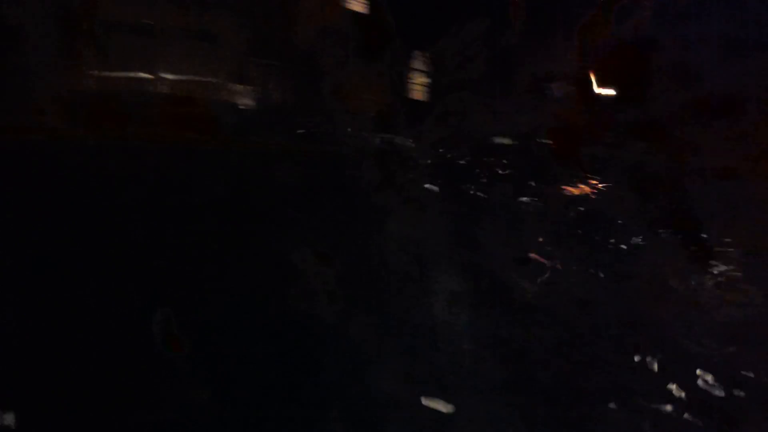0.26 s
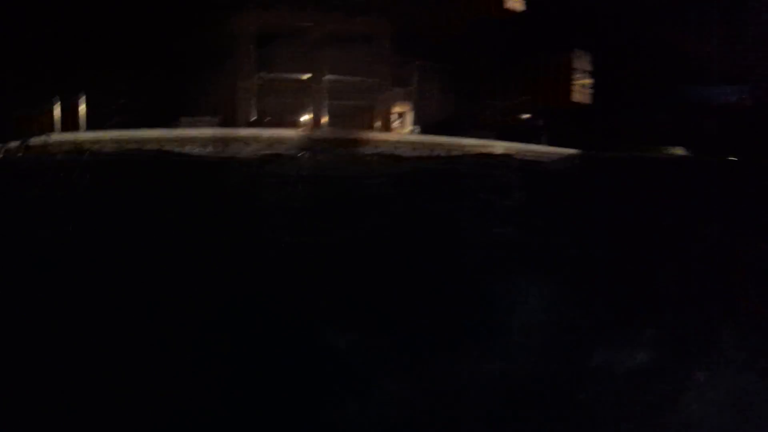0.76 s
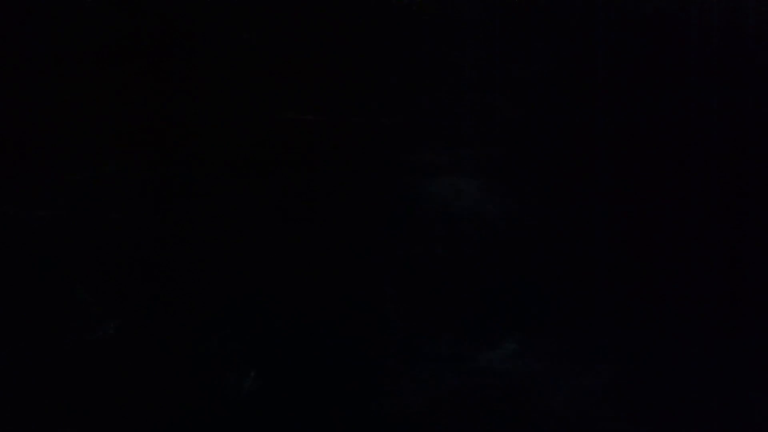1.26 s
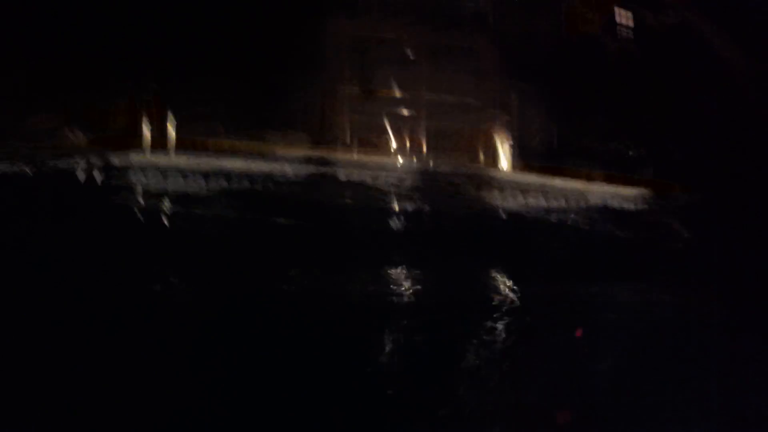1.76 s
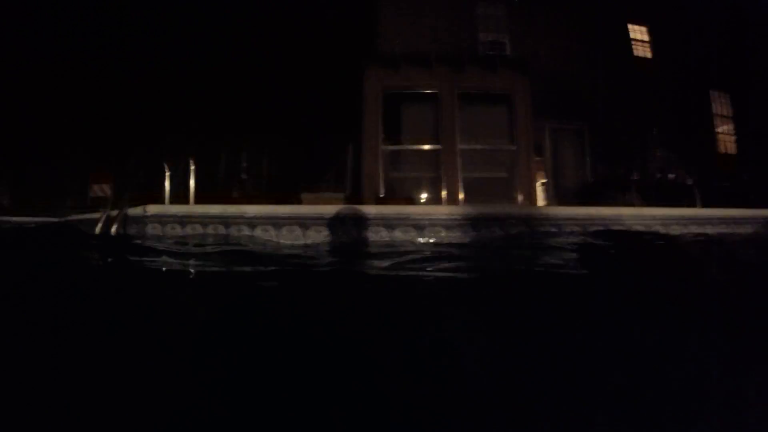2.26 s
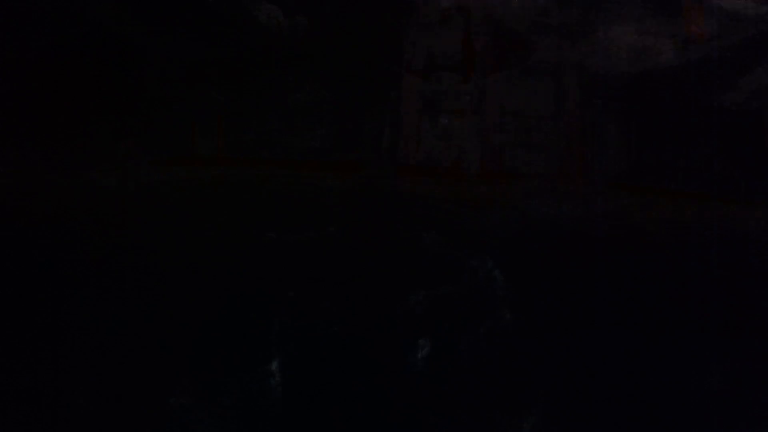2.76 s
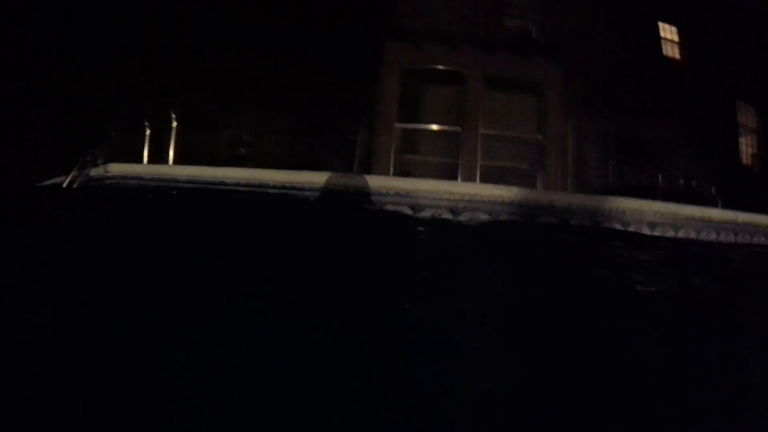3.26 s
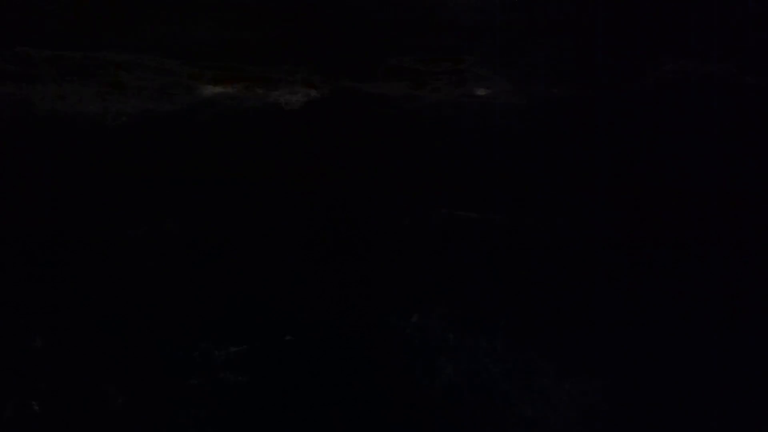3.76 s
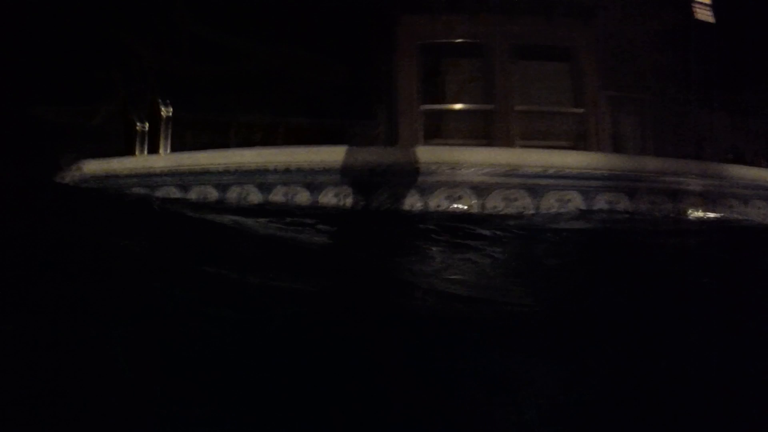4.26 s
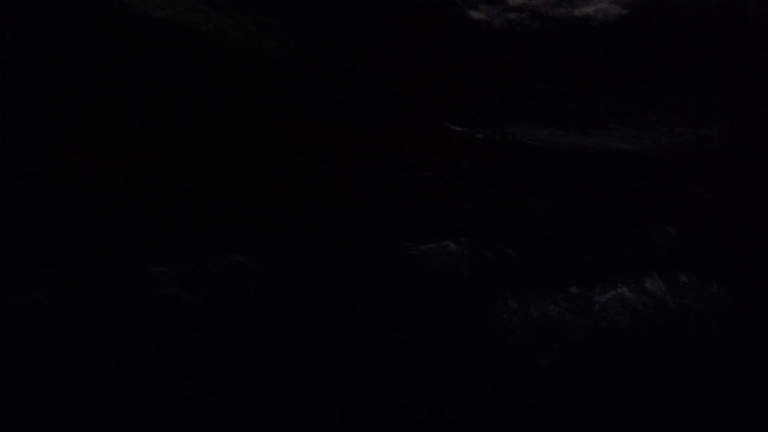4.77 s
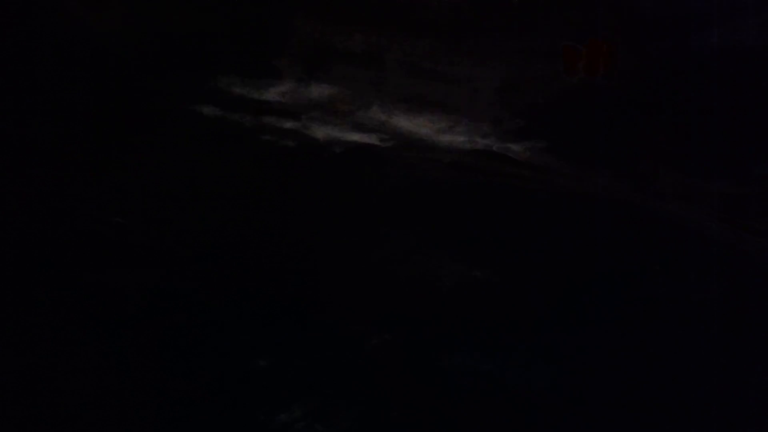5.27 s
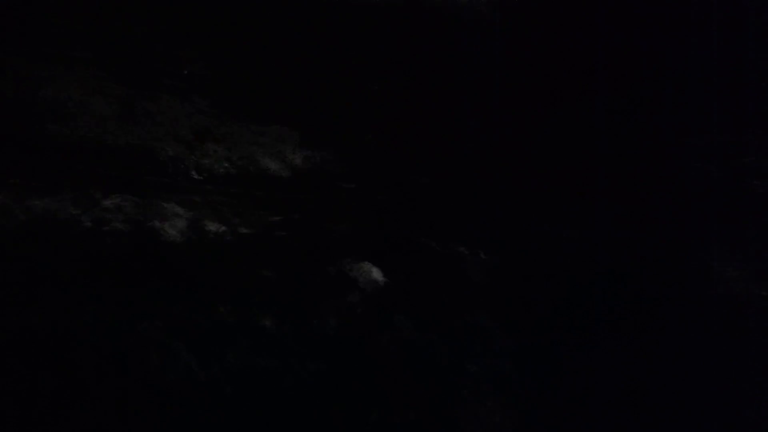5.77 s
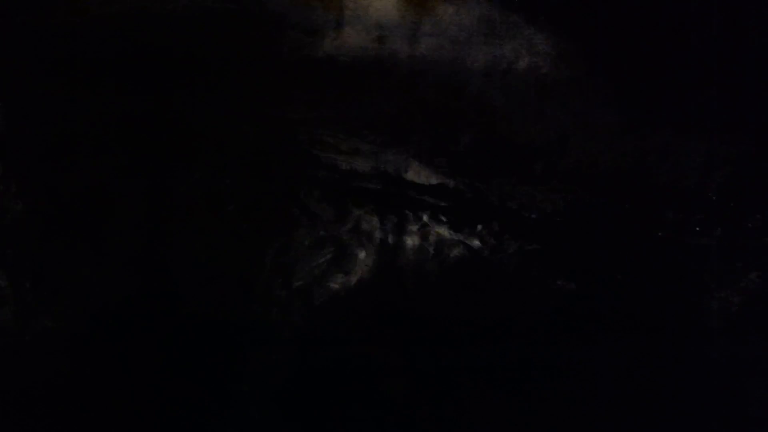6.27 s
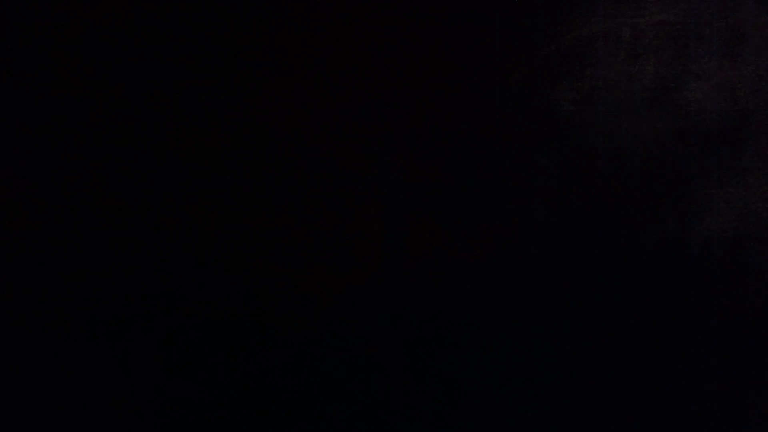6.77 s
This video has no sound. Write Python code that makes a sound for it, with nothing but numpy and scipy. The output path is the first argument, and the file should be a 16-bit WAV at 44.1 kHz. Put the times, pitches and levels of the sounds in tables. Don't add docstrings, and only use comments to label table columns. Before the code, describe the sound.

Close-up watery knocks and bubbly plinks hit a small hard shell in uneven bursts, separated by quiet trickling, faint fizz and drips.

```python
import sys
import numpy as np
from scipy import signal
from scipy.fft import rfft, irfft, next_fast_len
from scipy.io import wavfile
from scipy.ndimage import uniform_filter1d, map_coordinates

SR = 44100
rng = np.random.default_rng(int(sys.argv[2]) if len(sys.argv) > 2 else 0)


def int16_out(signal):
    q = np.round(np.clip(np.atleast_2d(signal).T, -1, 1) * 32767)
    wavfile.write(sys.argv[1], SR, q.astype(np.int16))


def gain_from_decibels(decibels):
    exponent = np.asarray(decibels, float) / 20
    return 10 ** exponent


N = 309141

# centre_hz, width_hz, level_db
CASE = [(155, 180, -3.5)]
# centre_hz, width_hz, level_db
SHELL = [(860, 170, -8.5), (1250, 60, 6), (1510, 47, 3.5), (2140, 520, -0.5), (3000, 1300, -6.5)]
# centre_hz, width_hz, level_db
LID = [(3570, 980, -5.5), (5570, 400, -1.5), (6500, 260, 0), (8700, 310, -6), (10527, 5900, -20)]


def unit(x):
    return x / np.sqrt(np.mean(x ** 2) + 1e-20)


def filtered(x, response):
    m = next_fast_len(N + SR // 2)
    return irfft(rfft(x, m) * response(np.fft.rfftfreq(m, 1 / SR)), m)[:N]


def coloured(x, points):
    f, db = np.transpose(points)
    return unit(filtered(x, lambda hz: gain_from_decibels(np.interp(np.log(hz + 1), np.log(f + 1), db))))


def resonant(x, modes):
    def response(f):
        total = 0
        for k, (centre, width, db) in enumerate(modes):
            mode = 1j * f * width / (centre * centre - f * f + 1j * f * width)
            total = total + (-1) ** k * gain_from_decibels(db) * mode
        return total
    return filtered(x, response)


def wobble(rate):
    knots = rng.standard_normal(int(N * rate / SR) + 4)
    return map_coordinates(knots, [np.arange(N) * rate / SR])


def flutter(shape, size):
    once = uniform_filter1d(rng.standard_normal(shape), size)
    return unit(uniform_filter1d(once, size))


def humps(rows):
    t = np.arange(N) / SR
    total = np.zeros(N)
    for s, rise, fall, db in rows:
        total += db * np.clip(np.minimum(1 + (t - s) / rise, 1 - (t - s) / fall), 0, 1)
    return total


def placed(rows, s):
    at = np.round(s * SR).astype(int) + np.arange(rows.shape[1])
    return np.bincount(at.ravel(), rows.ravel(), N + rows.shape[1] + SR)[:N]


def bubbles(t, hz, t60, rise, attack):
    phase = 2 * np.pi * hz * t * (1 + rise * t / t60)
    return np.sin(phase) * gain_from_decibels(-60 * t / t60) * (1 - np.exp(-t / attack))


def grains(count, centre_hz, octaves, cycles, spread_db, size):
    s, pitch, chance = rng.random((count, 3)).T[:, :, None]
    hz = np.clip(centre_hz * 2 ** (octaves * (2 * pitch - 1)), 100, 15000)
    rows = bubbles(np.arange(size) / SR, hz, cycles / hz, rise=0.21, attack=3.3 / hz)
    level = gain_from_decibels(-spread_db * np.log(chance + 0.01))
    return unit(placed(rows * level, s * N / SR))


def slosh():
    # freq_hz, density_db
    slosh_spectrum = [(12, -36.5), (20, -1), (70, -8), (210, -10), (328, -16.5), (700, -18.5), (910, -48),
                      (1540, -120)]
    # time_s, level_db
    bob = [(0, -56), (1.261, -56.5), (1.3, -78), (1.45, -53.5), (1.721, -65), (1.811, -67.5), (1.9, -43.5),
           (2.048, -66), (2.349, -58.5), (2.8, -55.5), (2.9, -62.5), (3.301, -56.5), (3.801, -61.5),
           (4.601, -55.5), (4.9, -60), (5.45, -48.5), (5.64, -63), (6.74, -52.5)]
    # peak_s, rise_s, fall_s, gain_db
    lurch = [
        (6.771, 0.031, 0.49, 21),
    ]
    slosh_db = np.interp(np.arange(N) / SR, *np.transpose(bob)) + humps(lurch)
    swell = coloured(rng.standard_normal(N), slosh_spectrum)
    rocking = np.clip((slosh_db + 57.5) / 18, 0, 0.9)
    pushed = (1 - rocking) * swell + rocking * unit(resonant(swell, CASE))
    return gain_from_decibels(slosh_db - 0.5 + 0.83 * wobble(8.0)) * pushed


def gurgle(gurgle_db, grainy, surge):
    # freq_hz, density_db
    gurgle_spectrum = [(180, -37.5), (300, -11), (800, 3.5), (1530, 0), (2300, -8.5), (3630, -14),
                       (5850, -47), (9900, -120)]
    bed = coloured(rng.standard_normal(N), gurgle_spectrum)
    bed = unit(bed + 2.8 * resonant(bed, SHELL))
    drips = grains(count=2200, centre_hz=1400, octaves=0.91, cycles=60, spread_db=1.4, size=2200)
    drips = unit(drips + 0.39 * resonant(drips, SHELL))
    return gain_from_decibels(gurgle_db - 1.47 + 2.8 * surge) * ((1 - grainy) * bed + 1.5 * grainy * drips)


def fizz(fizz_db, grainy, surge, wash_db, sealed_db):
    # freq_hz, density_db
    fizz_spectrum = [(1300, -27.5), (2300, -1.5), (3600, -6.5), (6500, -11.5), (9500, -17), (13800, -20.5),
                     (16000, -44)]
    hiss = coloured(rng.standard_normal(N), fizz_spectrum)
    hiss = unit(hiss + 0.55 * resonant(hiss, LID + SHELL))
    spits = grains(count=4000, centre_hz=5640, octaves=1.2, cycles=9, spread_db=4, size=400)
    spits = np.clip((wash_db - sealed_db) / 24, 0.2, 1) * spits
    unrest_db = 5.0 * np.clip(wash_db / 30, 0, 1) * (surge + wobble(76))
    return gain_from_decibels(fizz_db + 0.5 + unrest_db) * ((1 - grainy) * hiss + 0.6 * grainy * spits)


def water():
    # crest_s, rise_s, fall_s, over_calm_db, extra_spray_db
    surges = [(0, .1, 0.084, 12.5, -10), (.3, 0.43, 0.45, 6, 2), (1.25, 0.12, 0.062, 17, -19.5),
              (1.611, 0.22, 0.3, 20, -2), (1.899, 0.074, 0.1, 31.5, -1.5), (2.33, 0.094, 0.32, 6, 0),
              (2.8, 0.078, 0.082, 28.5, -9), (3.94, 0.082, 0.043, 13.5, 5.5), (4.75, 0.25, 0.039, 12.5, -2),
              (5.451, 0.34, 0.34, 22, -0.5), (6.929, 0.27, 0.2, 37, -5.5)]
    # deepest_s, closing_s, draining_s, loss_db
    dunks = [
        (1.3, 0.037, 0.28, 27),
        (2.13, 0.22, 0.21, 6),
        (2.9, 0.066, 0.21, -2.5),
        (3.8, 0.4, 0.13, 5.5),
        (4.9, 0.18, 0.19, 3.5),
        (5.64, 0.04, 0.45, 12),
        (6.81, .12, 0.069, 7),
    ]
    calm_gurgle_db, calm_fizz_db = -61.5, -60.5
    gurgle_sealed = 0.49
    wash_db, sealed_db = humps(row[:4] for row in surges), humps(dunks)
    spray_db = humps((s, rise, fall, db) for s, rise, fall, _, db in surges)
    gurgle_db = calm_gurgle_db + wash_db - gurgle_sealed * sealed_db
    fizz_db = calm_fizz_db + wash_db + spray_db - sealed_db
    grainy = np.clip((gurgle_db + 78.5) / 34, 0.25, 0.65)
    surge = wobble(28)
    moving = gurgle(gurgle_db, grainy, surge) + fizz(fizz_db, grainy, surge, wash_db, sealed_db)
    return slosh() + gain_from_decibels(0.8 * wobble(4.5)) * moving


def ringing(rows, cycles):
    s, db, hz = np.transpose(rows)[:, :, None]
    t = np.arange(SR // 14) / SR
    waver = 1 + 0.12 * flutter((len(s), len(t)), size=65)
    t60 = cycles / hz * (hz / 1500) ** 0.24
    ring = bubbles(t, hz, t60, rise=0.015, attack=3.3 / hz)
    ring = placed(gain_from_decibels(db + 7.0) * waver * ring, s)
    return ring + resonant(0.08 * ring, SHELL)


def froth():
    # start_s, peak_db, pitch_hz
    crowd = [(0.0117, -51, 1000), (0.381, -42, 2130), (0.4324, -36, 1390), (0.5095, -35, 1530),
             (0.524, -27, 3617), (0.6797, -36, 1250), (0.8567, -38.5, 4040), (1.0245, -37, 2420),
             (1.0259, -40, 1379), (1.0579, -16.5, 2804), (1.0724, -26.5, 2140), (1.576, -31, 1600),
             (1.6021, -32, 2350), (1.6122, -35, 3400), (1.6558, -36, 2210), (1.6863, -36, 2190),
             (1.8243, -37, 3500), (1.8778, -15, 4050), (1.8778, -12.5, 2296), (1.9417, -31, 2173),
             (2.02, -42, 2240), (2.7631, -30.5, 771), (2.8182, -33.5, 2756), (2.9633, -30.5, 731),
             (2.9837, -36.5, 2900), (3.6272, -33, 1660), (4.536, -36.5, 2430), (4.6439, -35, 1566),
             (4.6686, -25, 1760), (4.7556, -37, 1395), (5.2084, -43.5, 3560), (5.325, -36, 4270),
             (5.34, -29, 3740), (5.3463, -27.5, 1450), (5.3666, -38, 3014), (5.3695, -33, 1480),
             (5.3934, -35, 3800), (5.3971, -34.5, 1630), (5.4624, -25, 3930), (5.5576, -37.5, 3273),
             (5.8857, -39.5, 870), (6.8109, -33.5, 2260), (6.8396, -26.5, 2200), (6.8425, -33, 840),
             (6.9049, -29, 2930), (6.9224, -25.5, 3980), (6.9383, -23, 4048), (6.9584, -28, 3875),
             (6.9659, -31, 3170), (6.9717, -29, 1100), (6.976, -26, 3359), (6.985, -32, 2270)]
    # start_s, peak_db, pitch_hz
    pockets = [(0.0075, -45, 1095), (0.0496, -43, 1640), (1.114, -18, 1560), (0.2194, -30.5, 926),
               (0.2905, -22.5, 2150), (0.3558, -48, 2180), (0.4806, -45.5, 918), (0.8275, -45, 870),
               (0.8405, -44.5, 2120), (0.8608, -43, 1630), (1.1554, -31.5, 1186), (1.1772, -27, 2590),
               (1.3165, -55, 684), (1.5255, -41, 3240), (1.8637, -27.5, 1010), (1.9391, -34, 1011),
               (1.9841, -41, 3450), (1.9841, -34, 1540), (2.1104, -51.5, 1520), (1.203, -23, 880),
               (2.2961, -49.5, 1535), (2.3934, -47.5, 2325), (2.841, -24, 1480), (2.7997, -21, 1464),
               (2.8998, -54, 930), (2.926, -41.5, 1254), (3.0261, -54, 1444), (0.533, -23, 1200),
               (3.0537, -49.5, 893), (3.1974, -25, 957), (4.8169, -53.5, 2267), (4.8358, -48.5, 1046),
               (4.9316, -48, 3370), (5.2001, -49, 1257), (5.6398, -46, 771), (5.6746, -45, 1098),
               (5.798, -49, 883), (5.991, -44.5, 1330), (3.003, -38, 900), (6.123, -49.5, 720),
               (6.8298, -29.5, 1521)]
    return ringing(crowd, cycles=48) + ringing(pockets, cycles=54)


def glides():
    # start_s, level_db, from_hz, to_hz, length_s
    closing = [
        (1.969, -24.5, 700, 770, 0.052),
        (3.187, -20.5, 824, 1470, 0.043),
        (3.596, -27, 916, 3000, 0.046),
        (4.717, -21, 950, 2385, 0.023),
    ]
    s, db, low_hz, high_hz, length = np.transpose(closing)[:, :, None]
    u = np.clip(np.arange(SR // 16) / SR / length, 0, 1)
    hz = low_hz * (high_hz / low_hz) ** (u ** 2)
    phase = 2 * np.pi * np.cumsum(hz, axis=1) / SR
    level = gain_from_decibels(db - 19 * u + 3.0 * wobble(120)[:u.shape[1]])
    return placed(level * np.sin(np.pi * u) ** 0.39 * np.sin(phase), s)


def droplets(rows, gain_db):
    s, db, hz = np.transpose(rows)[:, :, None]
    t = np.arange(SR // 50) / SR
    noise = rng.standard_normal((2, len(s), len(t)))
    swell = gain_from_decibels(db + gain_db) * 0.64 * (1 - np.exp(-t / 0.00022)) * np.exp(-t / 0.0015)
    rough = 0.58 + 0.37 * unit(uniform_filter1d(noise[0], size=14, axis=1))
    ping = placed(swell * rough * np.sin(2 * np.pi * hz * t), s - 0.0005)
    patter = placed(gain_from_decibels(-0.5) * swell * noise[1], s - 0.0005)
    return ping + resonant(patter, LID)


def ticks():
    # start_s, level_db, pitch_hz
    single = [(0.2757, -29, 9653), (.2883, -27.5, 7760), (.3075, -29.5, 5650), (1.0274, -31, 5595),
              (1.0735, -13, 5178), (1.1948, -22, 7426), (1.2432, -33, 5004), (1.6255, -22, 8603),
              (1.8718, -29.5, 9670), (1.8806, -13.5, 8576), (1.8969, -26.5, 6550), (1.9441, -19.5, 4857),
              (2.7616, -26, 6620), (2.7868, -5.5, 5098), (2.7959, -9, 8526), (2.804, -21, 6626),
              (2.9668, -13.5, 9337), (3.555, -8.5, 8257), (3.7881, -25, 8566), (4.548, -18, 6500),
              (4.5975, -10.5, 5835), (4.7294, -9, 5720), (4.7575, -19, 7960), (4.7751, -9, 7367),
              (5.3939, -22, 5364), (5.43, -21, 5514), (5.4715, -21, 4836), (5.5221, -23.5, 6486),
              (5.5301, -25, 8665), (6.8754, -21, 6084)]
    # start_s, level_db
    stray = [(1.214, -36), (2.942, -40), (0.3584, -39), (0.3725, -51), (0.608, -48.5), (1.139, -27.5),
             (1.1585, -32), (1.276, -42.5), (1.56, -33.5), (1.7145, -39), (1.838, -34), (2.006, -35),
             (2.0436, -34.5), (2.3976, -47), (2.594, -45.5), (3.2285, -46), (3.6507, -37.5),
             (3.7231, -29.5), (3.738, -32), (3.78, -32.5), (3.941, -34), (3.982, -37), (4.3694, -40),
             (4.537, -33.5), (4.579, -30), (4.644, -38), (5.5855, -22.5), (5.6195, -40.5), (6.86, -29.5),
             (6.9214, -34.5),
             (1.4765, -47.5), (1.5406, -40.5), (1.5931, -41), (1.604, -44), (1.6452, -43.5), (1.6857, -36),
            (1.7214, -41), (3.573, -30.5), (3.731, -36.5), (4.543, -34), (4.6319, -39), (4.7218, -30.5),
            (4.7366, -29.5), (6.8987, -31), (6.9125, -35), (6.9716, -25.5), (6.9804, -28)]
    specks = stray
    octaves = 0.33 * rng.uniform(-1, 1, len(specks))
    specks = [(s, db, 6500 * 2 ** a) for (s, db), a in zip(specks, octaves)]
    return droplets(single + specks, 16.07)


def spray():
    # start_s, level_db, pitch_hz
    fine = [(0.2852, -21, 11410), (0.3104, -28, 6360), (0.3117, -28, 7780), (0.3712, -30.5, 9250),
            (0.5305, -29, 12200), (0.594, -33.5, 6430), (1.055, -32, 5340), (1.0589, -19.5, 6070),
            (1.1046, -21.5, 5440), (1.1042, -20, 8735), (1.1042, -27, 6533), (1.8938, -24, 7665),
            (1.962, -30.5, 4620), (2.0418, -32.5, 7240), (2.9635, -23, 4450), (3.5546, -13, 6700),
            (3.7864, -23.5, 8236), (4.3689, -30, 7873), (4.751, -31, 6500), (4.7725, -7.5, 6494),
            (4.7771, -36, 12550), (5.5001, -34.5, 8520), (5.5186, -22.5, 6680), (6.873, -20.5, 9200),
            (6.873, -20.5, 7823), (6.9702, -30, 6370)]
    return droplets([(s + 0.0013, db, hz) for s, db, hz in fine], 13.0)


def shoves():
    # start_s, peak_db
    pushes = [(0.299, -44), (0.5292, -39.5), (1.0718, -40), (1.1082, -36), (1.1935, -44), (1.2441, -22),
              (1.43, -42), (1.452, -40), (1.8773, -32), (1.9213, -33), (1.9685, -46.5), (2.7612, -39),
              (2.7835, -32), (2.8033, -36.5), (2.9438, -38), (3.5677, -45), (4.5479, -27), (4.668, -40.5),
              (4.7174, -43.5), (4.7795, -36), (5.396, -46), (5.4305, -23), (5.4647, -35.5), (5.483, -39),
              (5.5254, -27.5), (5.5405, -30.5), (5.561, -35.5), (5.5824, -29.5), (6.7719, -17),
              (6.7925, -21), (6.81, -27), (6.8355, -19.5), (6.8553, -38), (6.8745, -24), (6.908, -45),
              (6.9365, -36), (6.9528, -41), (6.9768, -29)]
    s, db = np.transpose(pushes)[:, :, None]
    u = np.arange(SR // 30) / SR / 0.00044
    return resonant(placed(gain_from_decibels(db + 16.5) * u * np.exp(-u), s), CASE)


def trapped():
    # start_s, peak_db, pitch_hz, t60_s
    blows = [(0.2836, -14, 3000, 0.028), (0.5304, -5.5, 1448, 0.041), (1.056, -18, 2748, .012),
             (1.058, -3.5, 4050, 0.018), (1.1101, 0, 1668, 0.011), (1.246, 5, 1783, 0.0047),
             (1.8543, -12, 3633, 0.014), (1.8981, -14.5, 2758, 0.018), (1.9005, -11, 3887, 0.0053),
             (1.9047, -9.5, 1250, 0.018), (1.92, -8.5, 2490, 0.013), (2.7845, -12, 3376, .03),
             (2.7914, -15, 2772, .036), (2.8706, -16.5, 3780, 0.012), (3.5658, -14.5, 1326, 0.016),
             (3.567, -2, 2300, 0.014), (3.5959, -2, 1636, 0.017), (4.6829, -9, 3115, 0.011),
             (4.78, -13.5, 4204, 0.013), (5.4202, -12.5, 1278, 0.043), (5.5424, -4, 775, 0.013),
             (5.5411, -10.5, 1510, .066), (5.5432, -8.5, 3547, 0.019), (5.5869, -4.5, 1124, 0.025),
             (6.862, -10.5, 3120, 0.012), (6.875, -5.5, 862, 0.022), (6.876, -4, 2684, 0.016),
             (6.9189, -11.5, 2540, 0.013), (6.9408, -13, 1304, 0.032), (6.95, -14.5, 2185, 0.014)]
    # start_s, peak_db, pitch_hz
    free = [(.3008, -18, 1790), (.3009, -16.5, 1250), (.4331, -25, 2810), (.4827, -23.5, 4210),
            (.511, -35.5, 856), (.5813, -24, 2880), (1.071, -23.5, 3360), (1.1596, -23, 2640),
            (1.2003, -13.5, 896), (1.5893, -15.5, 1140), (1.8602, -26, 2260), (1.8781, -24, 3500),
            (1.88, -15, 2910), (1.919, -24, 1000), (2.7755, -23.5, 890), (2.7857, -8, 4290),
            (2.8018, -17, 1004), (3.1873, -28, 1020), (3.597, -21, 950), (3.7237, -22, 1304),
            (4.5482, -21, 1362), (4.7222, -23.5, 1780), (4.779, -23, 860), (5.4303, -15, 1110),
            (5.4321, -22.5, 2134), (5.4892, -17, 2470), (5.5157, -15, 1735), (6.9058, -12, 978),
            (6.9446, -23, 3180), (6.95, -17, 1210)]
    # start_s, peak_db, pitch_hz
    choked = [(1.057, -22, 2234), (1.1076, -18.5, 2632), (1.16, -14, 3347), (1.1809, -18.5, 3120),
              (1.2191, -15.5, 1870), (1.247, -20, 3296), (1.6735, -21, 3550), (1.8123, -21.5, 4170),
              (1.8792, -15.5, 1320), (1.9074, -14.5, 3564), (2.839, -17, 1516), (2.9645, -21, 3275),
              (3.1889, -18.5, 1736), (3.5548, -18, 4070), (3.5557, -16, 2506), (3.5685, -20.5, 4080),
              (3.7245, -18, 2337), (4.5476, -26.5, 4100), (4.7795, -17.5, 2135), (4.781, -20.5, 3390),
              (5.4323, -18, 3650), (5.458, -23, 2360), (5.472, -18.5, 3400), (5.4887, -17.5, 4700),
              (5.5418, -14.5, 2467), (5.5932, -17.5, 4106), (6.8956, -20, 3680), (6.9222, -17, 1280),
              (6.9671, -16, 2260), (7.006, -12, 1849)]
    # start_s, peak_db,
    # pitch_hz
    drops = [(0.2209, -24, 1530), (0.2704, -29, 2310), (0.4, -31.5, 2300), (0.483, -27, 2760),
             (.598, -30, 2650), (0.6639, -29, 2166), (1.0424, -25, 3080), (1.16, -28, 1535),
             (1.49, -25, 860), (1.528, -29.5, 1510), (1.5546, -11, 1450), (1.579, -11, 4350),
             (1.5789, -33, 3250), (1.624, -26, 1016), (1.6574, -28.5, 1144), (1.6886, -31, 4100),
             (1.9692, -11, 706), (2.0213, -33, 1020), (2.8528, -29, 2580), (2.946, -25.5, 735),
             (3.696, -27, 3773), (3.7509, -25, 2588), (3.794, -28, 2080), (4.5466, -22.5, 3030),
             (4.6689, -17, 910), (4.756, -27.5, 2440), (5.3358, -22.5, 1840), (5.3454, -40, 1390),
             (5.406, -34, 3450), (5.5794, -24.5, 4293),
             (.0485, -40.5, 1120), (.1048, -41.5, 1330), (.3836, -36, 1220), (.7888, -38, 2910),
            (.8571, -40.5, 1360), (1.3519, -55, 574), (2.0828, -42, 2500), (2.452, -44, 4340),
            (2.5189, -41, 2830), (2.594, -44.5, 2310), (2.7247, -41.5, 1410), (3.0038, -33.5, 860),
            (3.7928, -31, 920), (3.929, -42, 2300), (3.9481, -32.5, 3380), (3.9809, -37, 3820),
            (4.0537, -49, 1430), (4.372, -43.5, 2310), (4.3969, -39, 2850), (4.632, -32.5, 1090),
            (4.9137, -36, 1594), (4.9339, -40.5, 1520), (5.2953, -37, 1400), (.671, -48, 4130),
            (5.8292, -48.5, 1438), (5.886, -34.5, 1850), (5.989, -37, 649), (6.2215, -47.5, 1250),
            (6.8088, -23.5, 860),
             (0.47, -28.5, 2500), (.536, -47, 790), (1.1, -37, 3300), (1.9, -42, 1100),
               (1.173, -33, 1055), (1.238, -16.5, 830), (1.3, -27.5, 554), (1.968, -22, 926),
               (2.7, -43, 1450), (3.678, -33, 750), (3.4, -45, 7630), (4.9112, -31, 976),
               (5.5795, -22.5, 787), (7.9, -30, 1700), (1.99, -36, 1130), (5.967, -46.5, 1600),
               (6.853, -12, 3100), (6.1752, -48.5, 840), (5.995, -43.5, 770), (2.021, -29, 1400),
               (6.887, -24, 900)]
    rows = list(blows)
    for table, t60 in ((free, 0.044), (choked, 0.021)):
        rows += [(s, db, hz, t60 * (1000 / hz) ** 0.36) for s, db, hz in table]
    shed_s, shed_db = 0.025, -36
    shed = []
    for (s, db, *_), (a, b, c) in zip(2 * blows, rng.random((2 * len(blows), 3))):
        shed.append((s + shed_s * a, min(db, -12) + shed_db - 12 * b, 800 * 2 ** (2.7 * c)))
    for s, db, hz in drops + shed:
        rows.append((s, db, hz, (0.03 - 0.0019 * (db + 25.0)) * (1000 / hz) ** 0.28))
    return rows


def slaps():
    s, db, hz, t60 = np.transpose(trapped())[:, :, None]
    t = np.arange(SR // 14) / SR
    rough = 1 + 0.53 * flutter((len(s), len(t)), size=45)
    ring = bubbles(t, hz, np.minimum(t60, 95 / hz), rise=0.024, attack=0.0002)
    ring = placed(gain_from_decibels(db + 4.0) * rough * ring, s)
    burst = rng.standard_normal((len(s), len(t))) * gain_from_decibels(db + rng.normal(0, 3, db.shape))
    splat = placed(gain_from_decibels(4.0) * (hz / 2000) ** 0.3 * burst * t / 0.00078 * np.exp(-t / 0.0013), s)
    crack = placed(gain_from_decibels(-16.0) * (hz / 2600) ** 2 * burst * t / 0.00085 * np.exp(-t / 0.00099), s)
    shove = resonant(resonant(gain_from_decibels(-8.5) * splat, CASE), CASE)
    shell = ring + resonant(0.062 * ring + splat, SHELL)
    shell = filtered(shell, lambda f: (1j * f / (450 + 1j * f)) ** 2)
    return shell + resonant(crack, LID) + shove


def scene():
    return (water() + froth() + glides() + ticks() + spray() + shoves() + slaps())[None]


def band_limit(x):
    return signal.sosfilt(signal.butter(12, 16500, fs=SR, output="sos"), x)


def record(dry):
    dull = filtered(dry[0], lambda hz: 1 / (1 + (hz / 11000) ** 5))[None]
    clipped = dull / (1 + np.abs(dull / 0.98) ** 6) ** (1 / 6)
    return band_limit(clipped)


dry = scene()
out = record(dry)
int16_out(out)
```